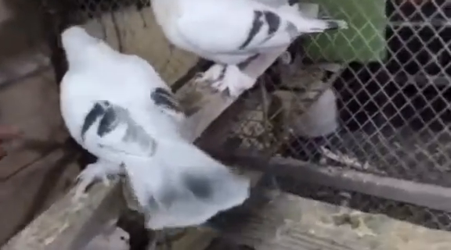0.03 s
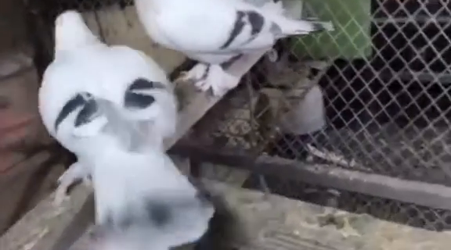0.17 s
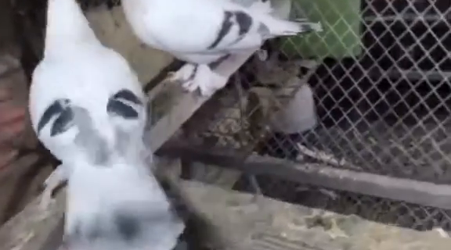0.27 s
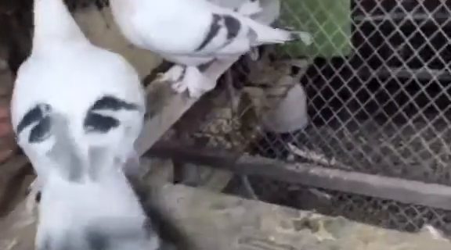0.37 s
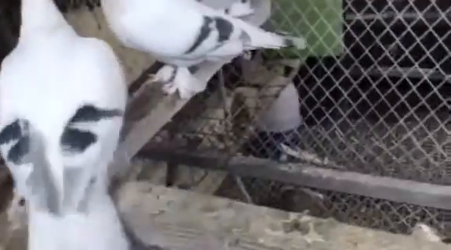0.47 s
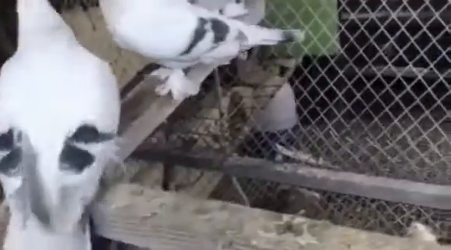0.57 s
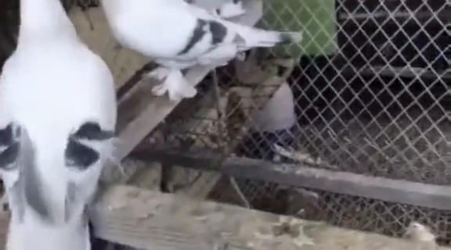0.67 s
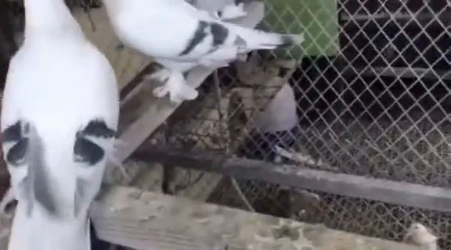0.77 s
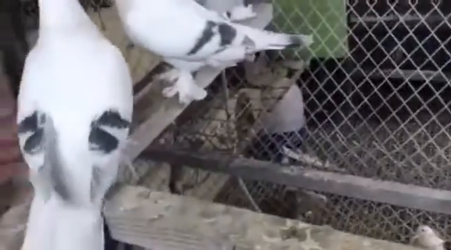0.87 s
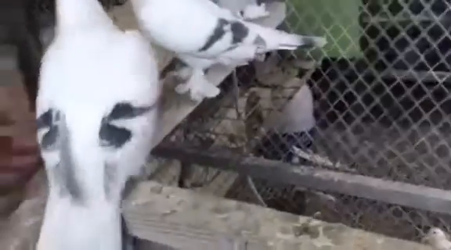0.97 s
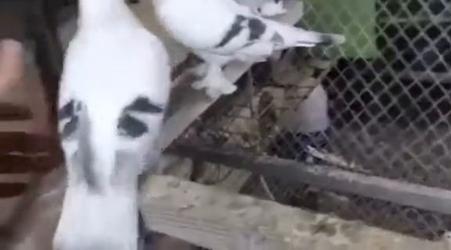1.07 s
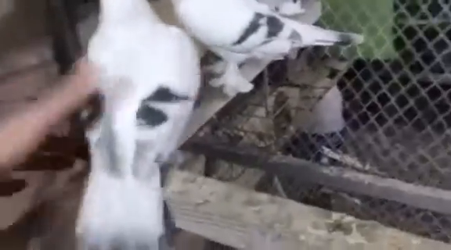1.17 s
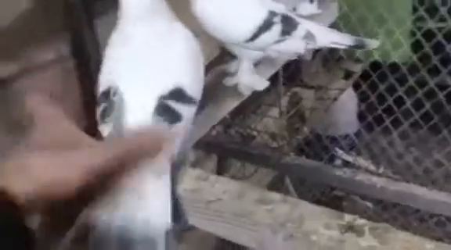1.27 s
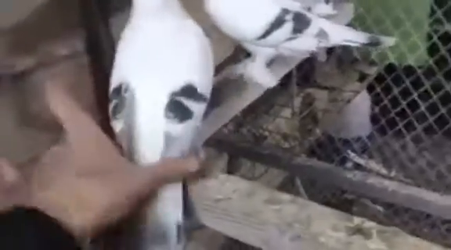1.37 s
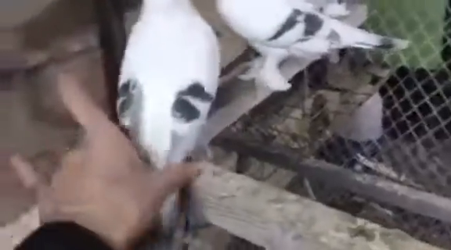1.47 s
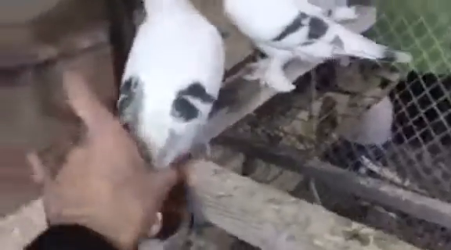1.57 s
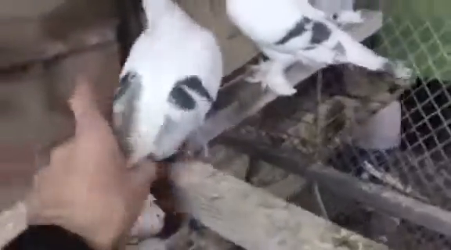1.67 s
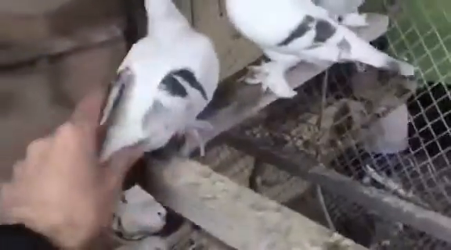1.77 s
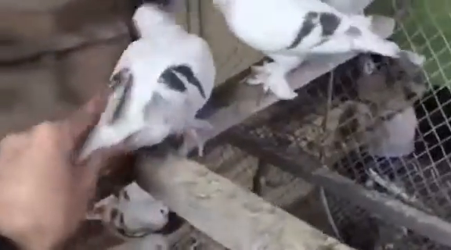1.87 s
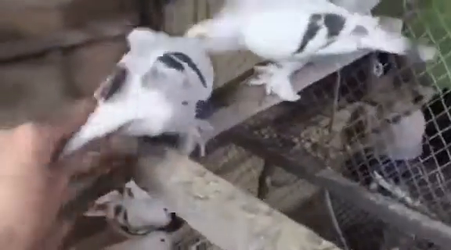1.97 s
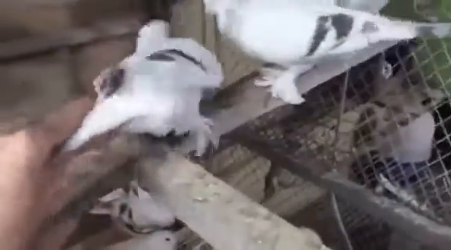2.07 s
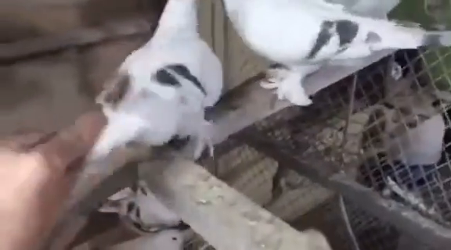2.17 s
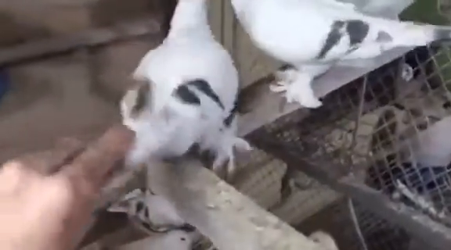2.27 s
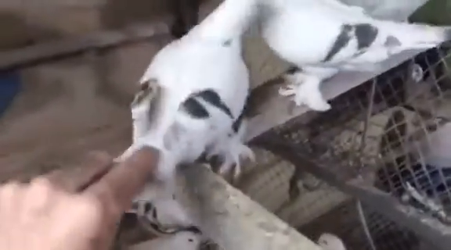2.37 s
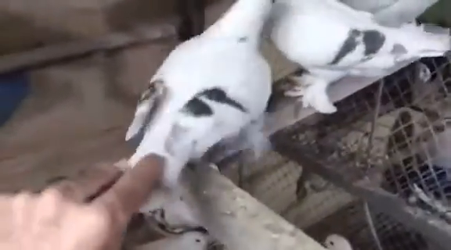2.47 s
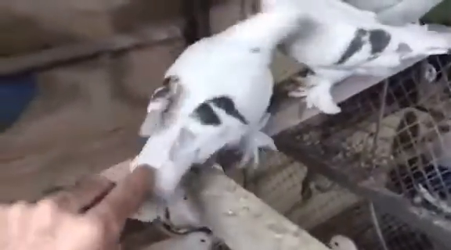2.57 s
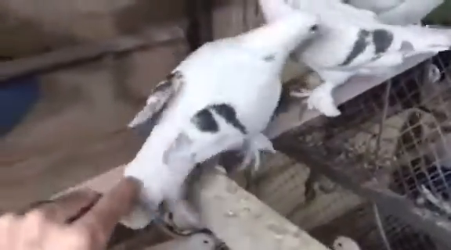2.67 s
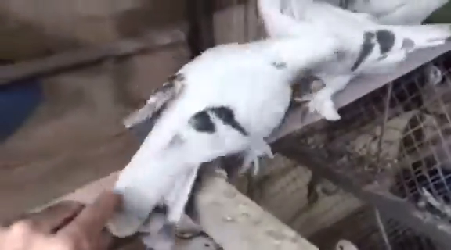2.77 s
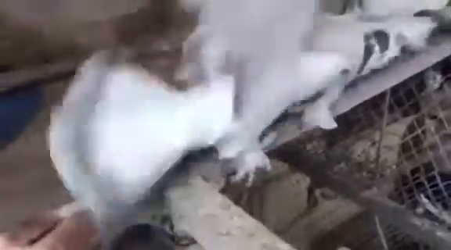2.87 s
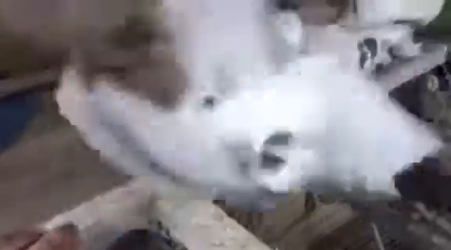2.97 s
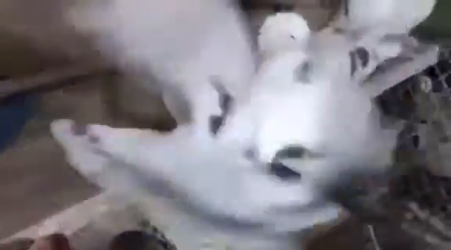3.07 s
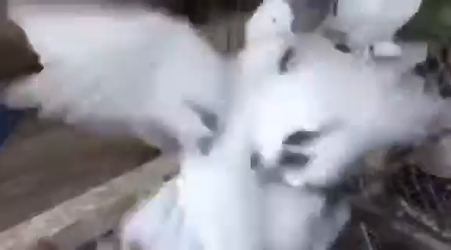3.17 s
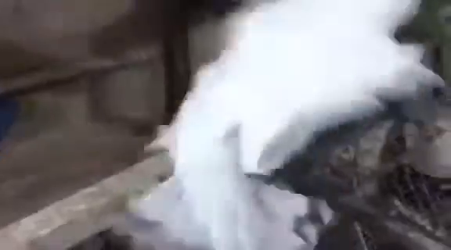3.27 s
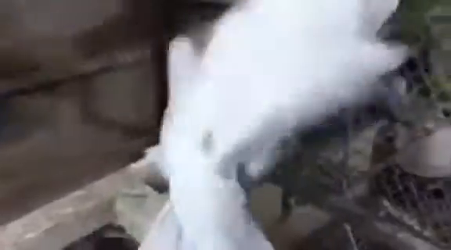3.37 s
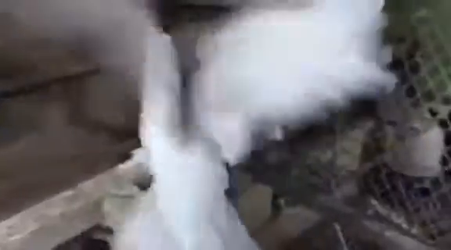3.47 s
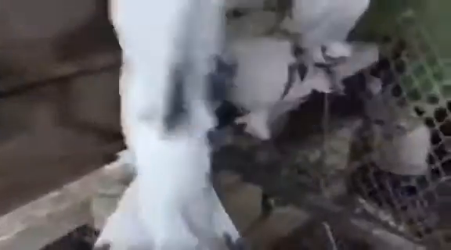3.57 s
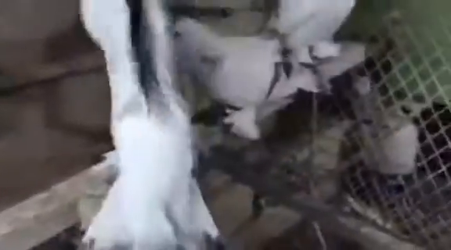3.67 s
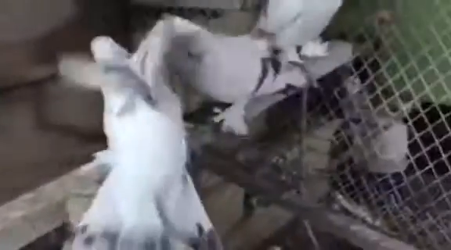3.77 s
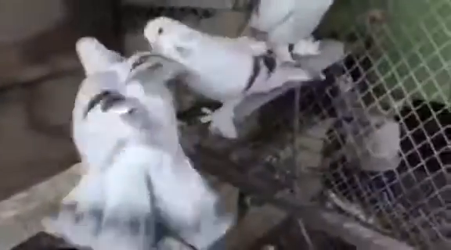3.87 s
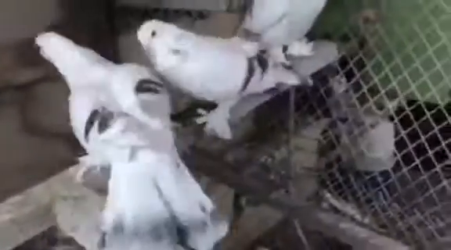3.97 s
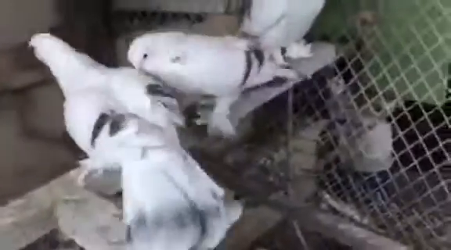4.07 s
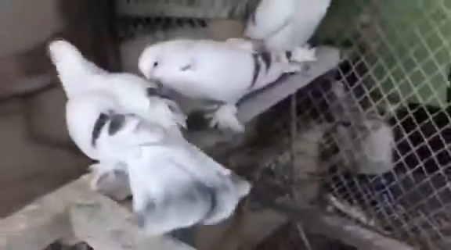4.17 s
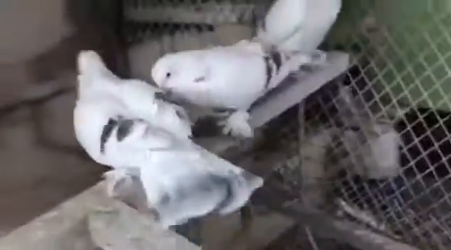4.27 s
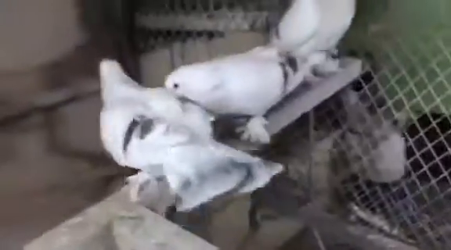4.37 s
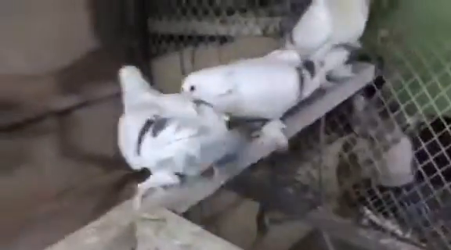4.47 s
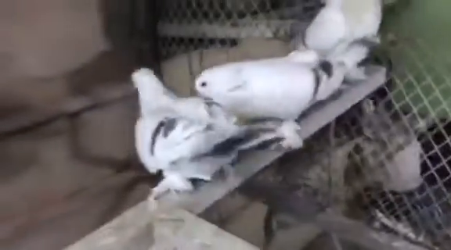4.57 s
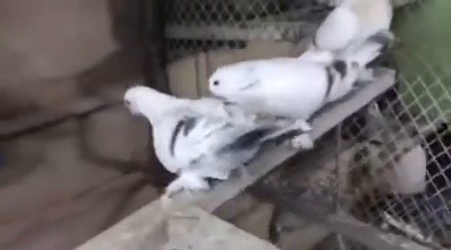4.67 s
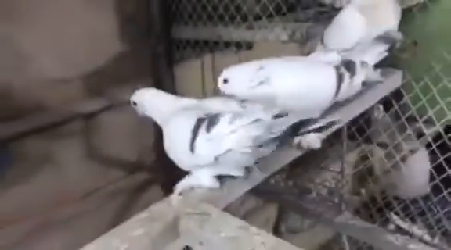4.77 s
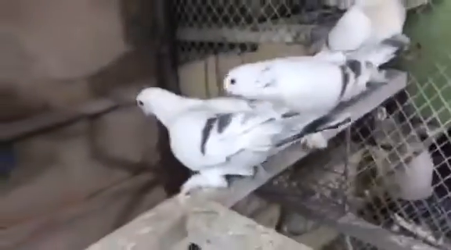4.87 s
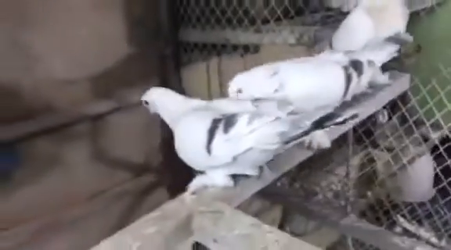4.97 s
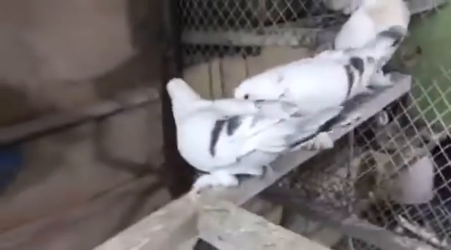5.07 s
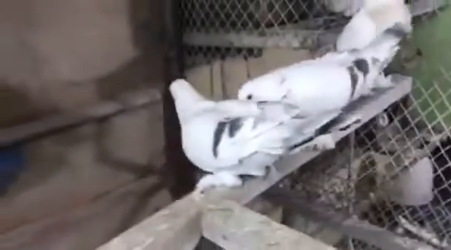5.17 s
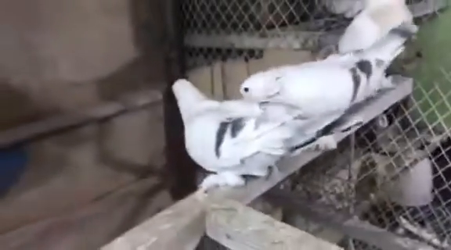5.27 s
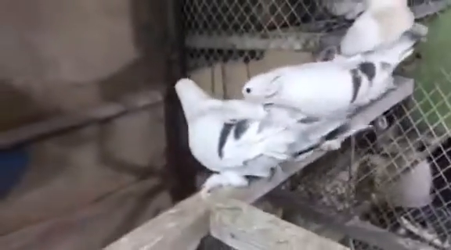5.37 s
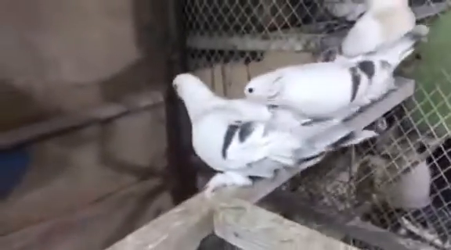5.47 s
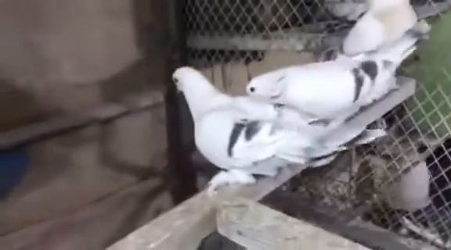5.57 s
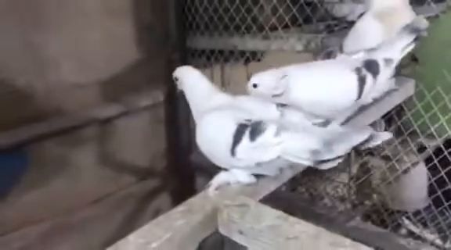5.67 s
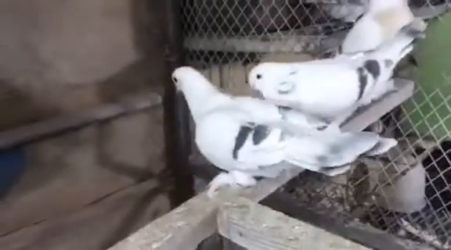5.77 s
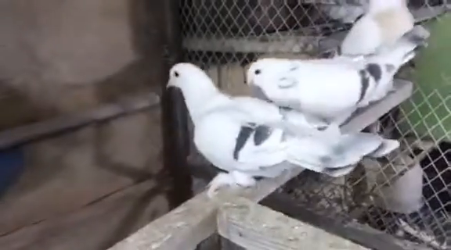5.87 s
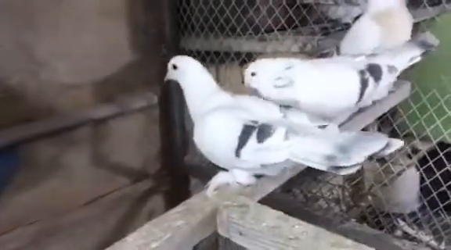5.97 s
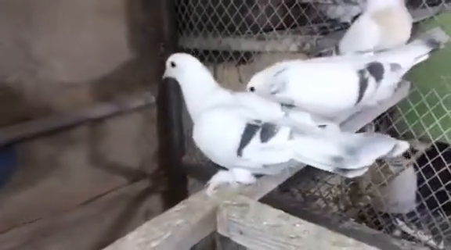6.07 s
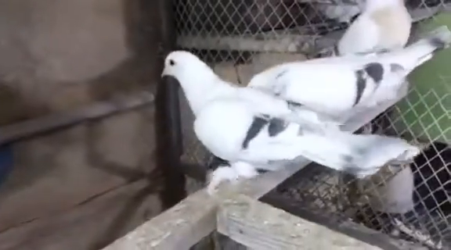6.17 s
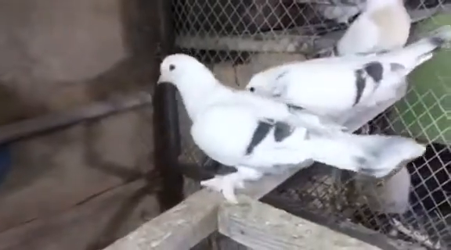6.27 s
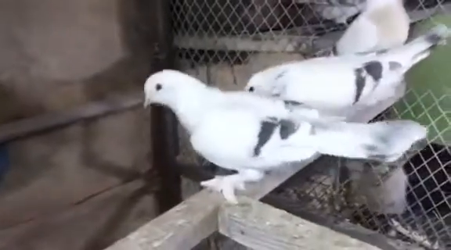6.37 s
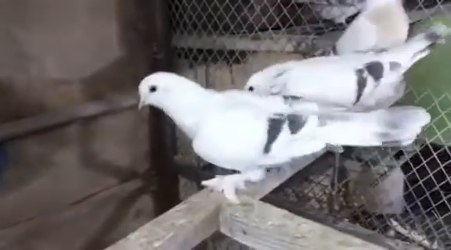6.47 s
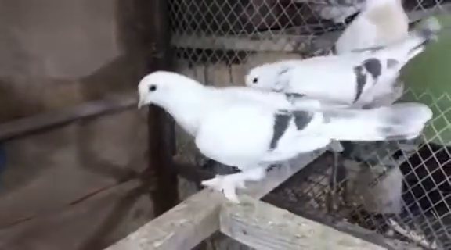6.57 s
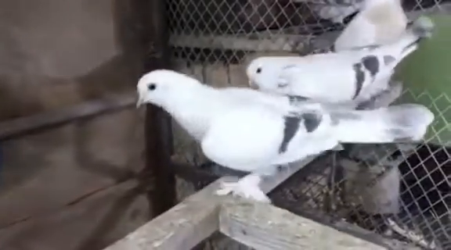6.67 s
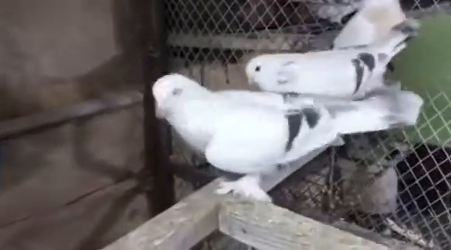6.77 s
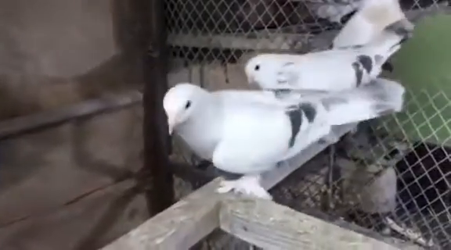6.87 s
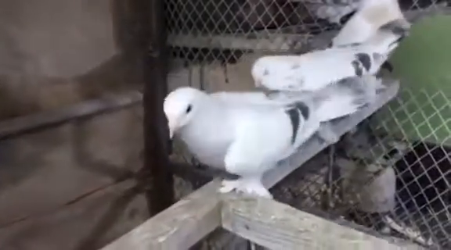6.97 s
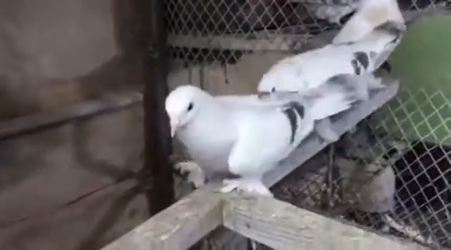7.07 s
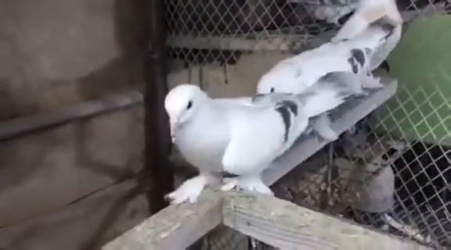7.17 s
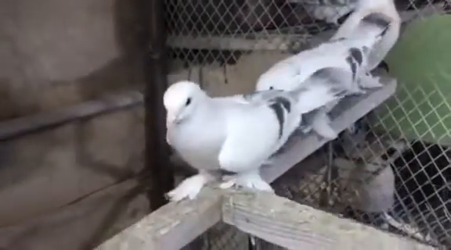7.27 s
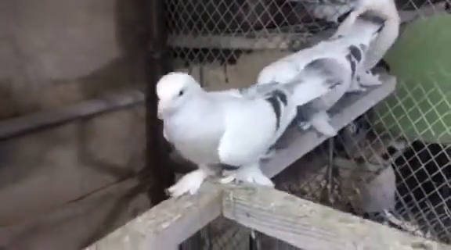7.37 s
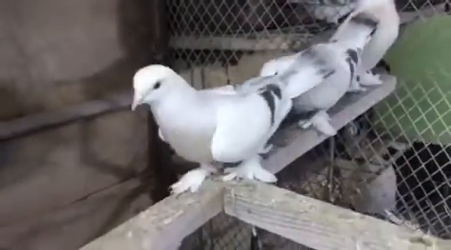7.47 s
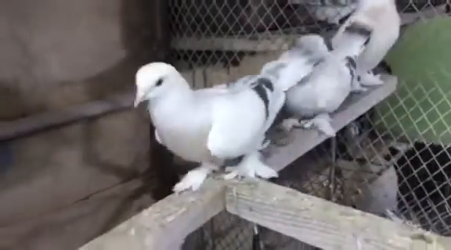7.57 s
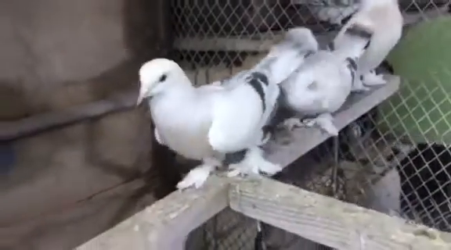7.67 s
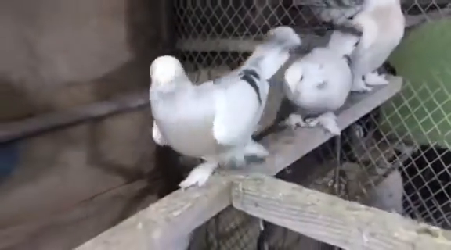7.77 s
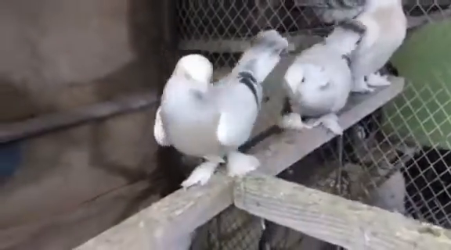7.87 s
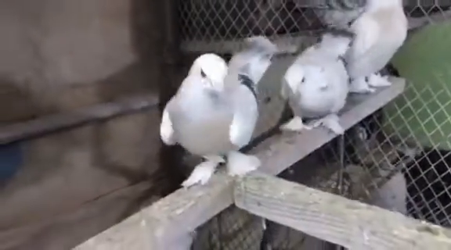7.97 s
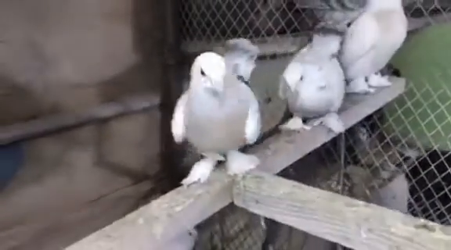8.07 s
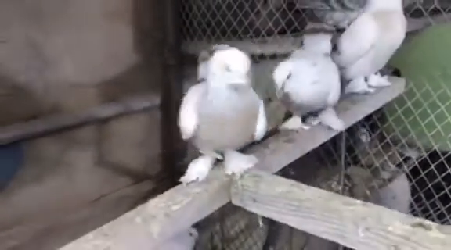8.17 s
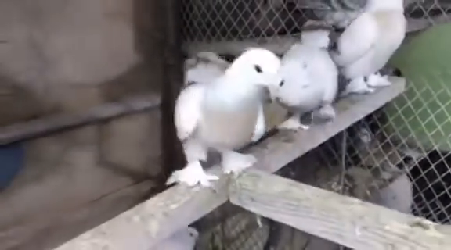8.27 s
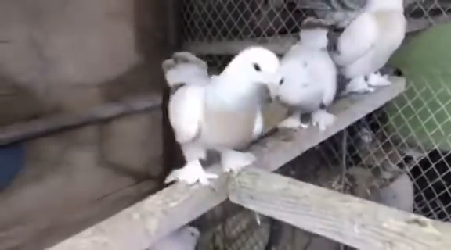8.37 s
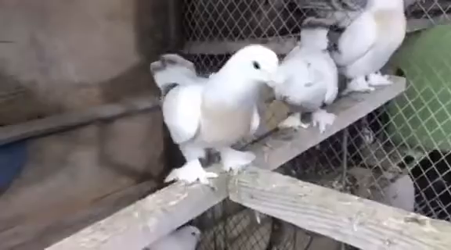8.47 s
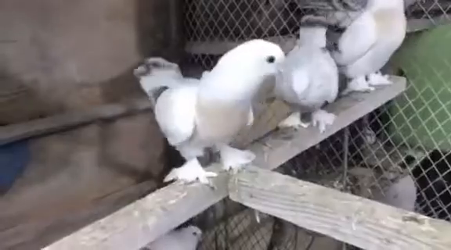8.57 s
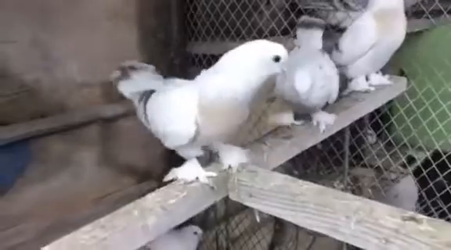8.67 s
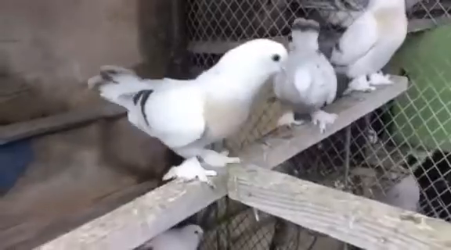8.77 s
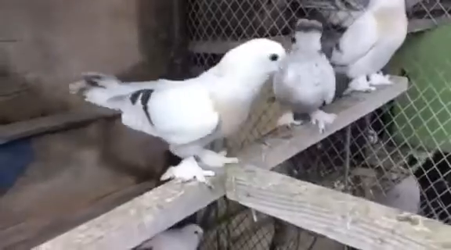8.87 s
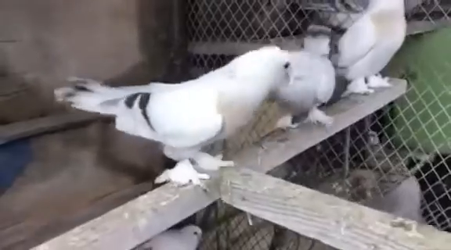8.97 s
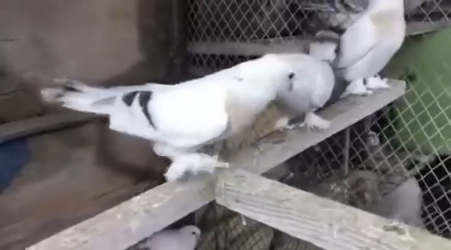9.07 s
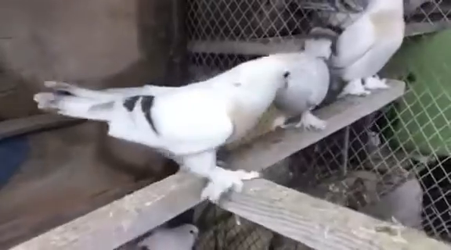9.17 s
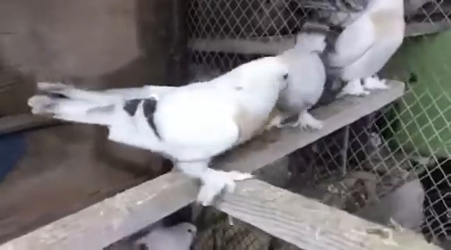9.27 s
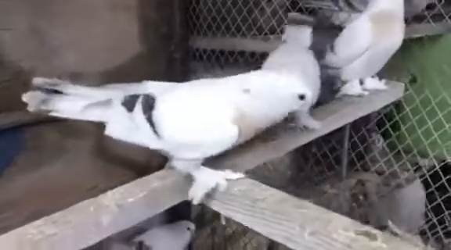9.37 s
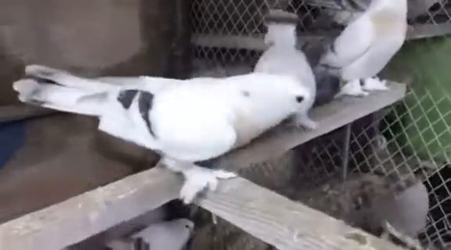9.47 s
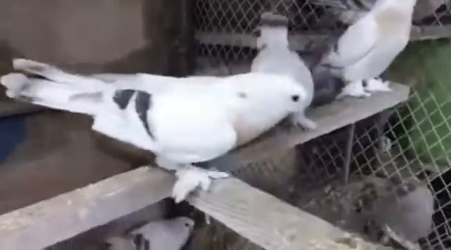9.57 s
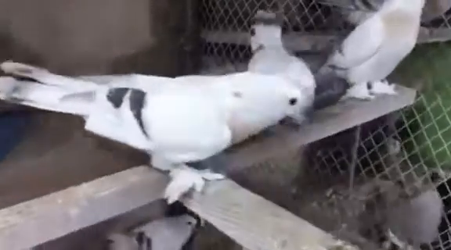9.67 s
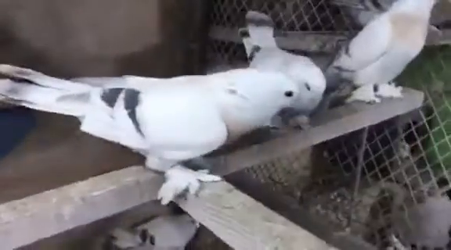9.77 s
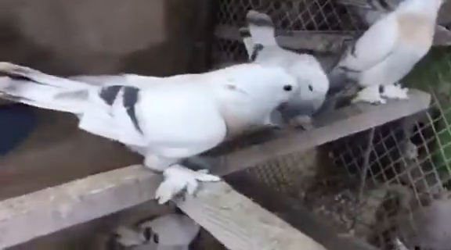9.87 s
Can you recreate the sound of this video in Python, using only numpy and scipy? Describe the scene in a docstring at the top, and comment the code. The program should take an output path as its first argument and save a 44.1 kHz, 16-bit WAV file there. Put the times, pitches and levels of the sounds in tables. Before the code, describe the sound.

Throughout, two low motors hum together, swelling and sinking roughly every 0.7 seconds over a dull outdoor rumble; a thin, faint whine rises around 1-2 seconds, then lingers. Close to a phone in a small wooden loft, a pigeon shifts on its perch: sharp claw ticks and a tiny scrape at 0.4, soft feather rustles and more ticks until a stronger rustle at 2.8. From 2.95 to 3.4 come five quick wing claps, crisp cracks with hollow pops and low air thumps, the last weaker, then feathers settling. Cooing starts softly at 4.3 and returns around 5.2, 6.3, 7.3, 8.5 and 9.4: rolling throaty throbs, muffled gliding moans, and low growls ending the phrases. Short fluttering rasps come around and between phrases. Light claw ticks and faint rustles continue to the end, with short woody reflections.

```python
"""Two motors hum and beat slowly throughout, over a dull outdoor rumble and thin filtered-noise whines.
First a pigeon, nudged along its perch in a small wooden loft, ticks its claws and rustles: bursts of noise.
Around three seconds in come five wing claps: noise cracks through quill resonances, with decaying sine pops and thumps.
Then a cock coos in rolling phrases: throaty throbs, soft gliding moans and growls built from sine partials,
with rasps around them from a fluttering throat resonance, while claws go on ticking on wood close to a phone."""
import sys
import numpy as np
from scipy import signal
from scipy.fft import rfft, irfft
from scipy.io import wavfile
from scipy.ndimage import uniform_filter1d

SR = 44100
rng = np.random.default_rng(int(sys.argv[2]) if len(sys.argv) > 2 else 0)


def dump(signal):
    """Clip the signal to [-1, 1] and save it as 16-bit WAV at the path in sys.argv[1]."""
    limited = np.clip(np.atleast_2d(signal).T, -1, 1)
    pcm = np.round(limited * 32767).astype(np.int16)
    wavfile.write(sys.argv[1], SR, pcm)


N = 437913
T = np.arange(N) / SR

# Spectrum of the outdoor rumble: pitch_hz, relative level_db
RUMBLE_COLOUR = [(20, -32), (35, -3), (50, -3), (70, 2.5), (110, 0), (170, -4), (240, 3.5), (330, 1),
                 (430, -7), (650, -7), (1000, -8), (1400, -15), (2200, -25.5), (3500, -31.5), (6000, -39),
                 (9000, -47.5)]
# Weaker steady lines of the motor hum: pitch_hz, level_db (mean of a slow waver)
HUM_LINES = [(52, -56.5), (158, -57.5), (206, -56), (229, -59.5), (283, -54.5)]
# Spectrum of sliding feathers: pitch_hz, relative level_db
FEATHER_SPECTRUM = [(300, -17.5), (900, -19.5), (1500, -4.5), (2400, -2), (4000, -1.5), (4800, -4),
                    (5600, 3), (7000, -5.5), (9000, -7)]
# A bird shifts and its feathers slide over each other: centre_s, level_db (before flutter), half_length_s
FEATHER_RUSTLES = [(0.48, -60.5, 0.16), (0.865, -63.5, 0.089), (1.22, -59, 0.035), (1.98, -62, 0.11),
                   (2.173, -58.5, 0.057), (2.454, -63, 0.09), (2.787, -49, 0.063), (2.808, -44, 0.013),
                   (2.885, -48.5, 0.059), (3.534, -59, 0.48), (3.785, -49.5, 0.034), (4.04, -62, 0.043),
                   (4.37, -61, 0.12), (6.807, -64, 0.073), (7.054, -59.5, 0.033), (7.546, -61.5, 0.024),
                   (7.76, -64, 0.13), (9.01, -65.5, 0.081), (9.492, -69, 0.19)]
# Clearest ticks of claws on the perch: start_s, relative level_db, centre_hz
CLAW_TICKS = [(0.369, -45.5, 6500), (0.4016, -31.5, 3950), (.418, -47, 2000), (0.88, -35.5, 8000),
              (.883, -42.5, 4100), (1.344, -48.5, 4770), (1.875, -51.5, 6950), (2.1291, -39.5, 6100),
              (2.175, -42.5, 2540), (2.411, -36.5, 4650), (2.475, -45, 3000), (2.5974, -43, 1850),
              (2.801, -36, 6000), (2.813, -30, 5500), (2.818, -36.5, 3800), (2.877, -43, 5000),
              (3.536, -41, 4400), (3.5776, -42.5, 4180), (3.8, -43, 3000), (4.151, -54.5, 7540),
              (4.195, -51, 5500), (4.21, -43, 5030), (4.309, -52, 4000), (4.33, -40, 7500),
              (4.337, -34.5, 8000), (4.418, -46, 5210), (4.488, -53, 5500), (4.9515, -43.5, 4970),
              (5.456, -45.5, 1840), (6.16, -46, 6400), (6.555, -39.5, 5230), (6.748, -44.5, 5970),
              (7.346, -49.5, 6550), (7.792, -48, 7200), (7.8228, -44, 4630), (8.204, -50.5, 5940),
              (8.61, -45.5, 3460), (8.699, -41.5, 4700), (8.93, -43.5, 2580), (9.347, -45, 6450),
              (9.439, -51, 8600), (9.5982, -41.5, 5700)]
# Feet dragging over the perch: start_s, end_s, level_db (before the swell), centre_hz
FOOT_SCRAPES = [(0.404, 0.439, -50, 2270), (0.404, .44, -56.5, 8000), (0.888, .93, -71, 5900),
                (2.128, 2.193, -65, 5530), (4.332, 4.348, -53, 2530), (6.844, 6.871, -54, 3000),
                (9.555, 9.6, -67, 4160)]
# Wing claps: start_s, relative level_db, contact_s, thump_db (low thump of air), pop_db (hollow pop), pop_hz,
# tilt_db_per_octave (treble), lower_quill_hz, upper_quill_hz, tip_lag_s, tip_slap_db (against the first slap)
WING_CLAPS = [(2.945, -20, 0.0014, -30, -16.5, 910, -0.86, 1950, 4630, 0.0065, -15),
              (3.057, -20, 0.002, -26, -18, 970, 0.92, 2450, 5900, 0.0024, 5.5),
              (3.1678, -19, 0.0012, -26, -19, 895, 2, 1600, 3780, .002, -23.5),
              (3.28, -16.5, 0.00092, -21.5, -15, 865, -1.7, 2880, 3850, 0.00306, -8),
              (3.409, -29, 0.0016, -36, -43, 900, 1.6, 4370, 6100, 0.0065, -16)]
# Spectrum of a clap before its tilt: pitch_hz, relative level_db
CLAP_SPECTRUM = [(100, -15), (300, 0), (550, -3.5), (880, -2), (1250, -0.5), (1600, -0.5), (2100, -3),
                 (2700, -2.5), (3700, -1), (4900, -3.5), (6500, -3), (8300, -4.5), (10000, -8)]
# Rasps around the phrases: start_s, length_s, level_db (at the peak, before shimmer),
# first_throat_hz, last_throat_hz (throat resonance), peak_place (0-1)
THROAT_RASPS = [(4.736, 0.14, -50.5, 965, 1070, 0.13), (5.105, 0.055, -43.5, 1020, 1040, 0.24),
                (5.727, 0.18, -41, 960, 1078, 0.15), (6.139, 0.056, -46.5, 960, 1037, 0.45),
                (6.732, 0.11, -41.5, 833, 977, 0.5), (7.186, 0.051, -42, 930, 1017, 0.48),
                (7.755, 0.077, -45, 795, 946, 0.7), (8.073, 0.074, -41, 984, 1182, 0.27),
                (8.381, 0.062, -39, 924, 1023, 0.4), (8.967, 0.16, -48, 867, 985, 0.46)]
# Throbs in rolls of two to four: centre_s, centre pitch_hz (before the arch), relative level_db,
# octave_db (against the fundamental), roughness (0-1)
COO_THROBS = [(4.278, 299.5, -39.5, -4.5, 0.66), (4.356, 294.4, -39, -8, 0.75),
              (4.439, 307.3, -41, -4.5, 0.57), (4.521, 315.6, -43.5, -4.5, 0.54),
              (5.232, 319.4, -42.5, 1, 0.35), (5.343, 319, -39.5, -1, 0.42), (5.459, 330, -41.5, 0.5, 0.37),
              (6.265, 313, -40, -3.5, 0.58), (6.379, 321.4, -35, 1, 0.28), (7.321, 314.5, -41, 2, 0.45),
              (7.433, 319, -32, -1, 0.25), (8.515, 309.4, -36.5, -1, 0.54), (8.619, 316, -35.5, 0.5, 0.3),
              (9.403, 303, -45, 2, 0.51), (9.483, 309.4, -42, -2, .4), (9.556, 291, -37, -2.5, 0.6),
              (9.669, 314.3, -34, -5, 0.54)]
# Moans, each one unbroken glide; rows of: time_s, pitch_hz, level_db, octave_db (against the fundamental)
COO_MOANS = [
    [(4.37, 381, -52, -9), (4.43, 396.4, -48.5, -7), (4.5, 380, -53, -9)],
    [(4.59, 336.6, -48.5, -6), (4.66, 381, -48.5, -13), (4.69, 325, -41, -7), (4.715, 300, -54, -8)],
    [(5.37, 390, -47, -9), (5.41, 427, -45, -12), (5.45, 400, -50, -12)],
    [(5.485, 293, -45, 1), (5.52, 368.5, -44, -15), (5.55, 378, -42, -18), (5.575, 333, -44.5, -2),
     (5.6, 318, -52, 8), (5.62, 300, -52, 9)],
    [(5.575, 429, -47, -14), (5.62, 390, -47, -9), (5.65, 374, -37.5, -11), (5.68, 395, -50, -14)],
    [(6.305, 312, -52, 5), (6.33, 303, -49, 7), (6.36, 285, -52, 1.5)],
    [(6.405, 385, -47.5, -12), (6.44, 411, -43.5, -15), (6.47, 393, -48, -19), (6.52, 432, -46, -22),
     (6.555, 408, -42, -12), (6.577, 326, -34, -4), (6.6, 296, -46, 4)],
    [(6.935, 360, -49, -12), (6.965, 331, -40, -14), (7.0, 279, -44, -13)],
    [(7.325, 318, -48, -4), (7.36, 360, -45, -14), (7.38, 395, -50, -14)],
    [(7.355, 312, -57, 10), (7.382, 311, -53, 10), (7.415, 305, -55, 10)],
    [(7.46, 429.4, -49, -14), (7.52, 397, -47.5, -18), (7.56, 409, -53.5, -14), (7.59, 418, -45, -15),
     (7.608, 340, -37.5, -11), (7.625, 300, -48, 0)],
    [(8.455, 340, -43, -12), (8.48, 376, -41.5, -15), (8.505, 385, -48, -9)],
    [(8.525, 302, -53, 8), (8.56, 295, -54, 9), (8.595, 322, -56, 8)],
    [(8.645, 448, -50, -14), (8.72, 461, -58, -10), (8.785, 469, -55, -14), (8.803, 361, -47, -10),
     (8.82, 313, -33, -5.5), (8.845, 235, -48, -13)],
    [(9.34, 243, -42, -16), (9.365, 261.3, -40, -17), (9.4, 302, -41, -10), (9.445, 340, -41, -18),
     (9.468, 344, -43, -14), (9.484, 306, -36, -8), (9.505, 265, -47, -5)],
    [(9.47, 376, -48, -16), (9.51, 350, -42.5, -12), (9.55, 315, -44, -10)],
    [(9.5, 255, -55, 5), (9.53, 274.4, -54, 10), (9.6, 284, -58, 8.5), (9.65, 285.4, -52, 10),
     (9.7, 290, -54, 7), (9.75, 249.4, -56.5, 10), (9.8, 256, -56, 12), (9.83, 238, -56, 10)],
    [(9.575, 328, -46, -6), (9.605, 307, -43.5, -2), (9.625, 314, -53, 8), (9.65, 318, -56, 5)],
    [(9.818, 350, -49, -3), (9.842, 336, -32, -8), (9.868, 313, -49, -12)],
]
# Growls that end the phrases, their third partial near the throat resonance;
# rows of: time_s, pitch_hz, level_db, octave_db, third_partial_db (both against the fundamental)
COO_GROWLS = [
    [(4.7, 221.6, -59, -5, 0), (4.83, 228, -57, -6, 0)],
    [(5.655, 231, -49, -6, 2), (5.68, 223, -44.5, -10, 0), (5.72, 207, -52, -8, -4)],
    [(6.595, 217, -50, 6, 9), (6.62, 221.4, -52, 6, 15), (6.655, 232.4, -52, 2, -3),
     (6.69, 244, -51.5, 1, -7), (6.72, 238, -57, -1, -6)],
    [(7.615, 218, -49, 1, 5), (7.65, 226.7, -48, -6, 3), (7.675, 244, -46, -5, 1),
     (7.705, 261, -46.5, 2, -4), (7.745, 255, -54, -2, -7)],
    [(8.82, 207, -48, -6, 3), (8.87, 213.6, -55, -9, 7.5), (8.9, 218.3, -43.5, -13, -6),
     (8.94, 202, -46.5, -3, 0)],
    [(9.85, 225, -51, 3, -2), (9.88, 226, -44.5, -1, -4), (9.94, 210, -51, -2, 0)],
]


def undb(db):
    """Decibels to gain."""
    return 10 ** (np.asarray(db) / 20)


def unit(x):
    """Scale to rms 1."""
    return x / np.sqrt(np.mean(x ** 2) + 1e-20)


def add(out, s, x):
    """Mix a sound in at a time in seconds."""
    i = int(s * SR)
    out[i:i + len(x)] += x[:max(N - i, 0)]


def noise(size=N):
    """White noise, rms near 1."""
    return rng.standard_normal(size)


def walk(rate_hz, size=N):
    """Smooth random wandering, spread near 1."""
    k = max(int(SR / rate_hz), 1)
    steps = np.repeat(noise(size // k + 1), k)
    return 1.3 * uniform_filter1d(uniform_filter1d(steps, k), k)[:size]


def colour(x, points):
    """Causal filter through (Hz, dB) points, with unit power gain."""
    hz, db = np.transpose(points)
    size = 8192
    f = np.maximum(np.fft.rfftfreq(size, 1 / SR), 1)
    log_gain = np.log(undb(np.interp(np.log(f), np.log(hz), db)))
    # folding the cepstrum gives minimum phase, so nothing sounds early
    cepstrum = irfft(log_gain)
    cepstrum[1:size // 2] *= 2
    cepstrum[size // 2 + 1:] = 0
    response = irfft(np.exp(rfft(cepstrum)))
    return signal.fftconvolve(x, response / np.linalg.norm(response))[:len(x)]


def even(x, span_hz=700):
    """Level out the broad chance humps in the spectrum of a short burst."""
    power = uniform_filter1d(np.abs(rfft(x)) ** 2, max(int(span_hz * len(x) / SR), 1))
    hz = np.fft.rfftfreq(len(x), 1 / SR) + 1
    return colour(x, np.column_stack([hz, -10 * np.log10(power + 1e-12)]))


def resonate(x, hz, width_hz):
    """One resonance, gain 1 at its centre."""
    return signal.lfilter(*signal.iirpeak(min(hz, SR / 3), hz / width_hz, fs=SR), x)


def resonate_twice(x, hz, width_hz):
    """Two equal resonances in a row, for steeper sides."""
    return resonate(resonate(x, hz, width_hz), hz, width_hz)


def background(rumble_db=-47.5, high_whine_hz=6600, high_whine_db=-81):
    """A dull outdoor rumble; a thin whine swells for a second and lingers faintly beside a higher one."""
    rumble = unit(colour(noise(), RUMBLE_COLOUR)) * undb(rumble_db + .5 * walk(1.0) + 0.75 * walk(14))
    swell_db = np.interp(T, [.75, .95, 1.3, 1.9, 2.1, 4.5], [-76, -69.0, -66, -68.5, -72.5, -78])
    whine = unit(resonate_twice(noise(), 4750, 230))
    whine += undb(-4) * unit(resonate(noise(), 3190, 440))
    high_whine = unit(resonate_twice(noise(), high_whine_hz, 140))
    return rumble + whine * undb(swell_db + 1.3 * walk(8.3)) + high_whine * undb(high_whine_db)


def motors(hz=78.3, db=-45, second_db=-3.5, beat_hz=1.422, dip_s=.365):
    """Two motors run at nearly the same speed, so their hum swells and sinks; weaker lines waver above and below."""
    phase = 2 * np.pi * (hz * T + .04 * walk(2.5))
    # the second motor opposes the first at dip_s and once per beat after it
    beat = 2 * np.pi * beat_hz * (T - dip_s)
    drone = undb(db + 1.3 * walk(11)) * (np.sin(phase) - undb(second_db) * np.sin(phase + beat))
    lines = np.zeros(N)
    for line_hz, line_db in HUM_LINES:
        line_phase = 2 * np.pi * (line_hz * T + 0.21 * walk(7))
        lines += undb(line_db + 2.0 * walk(4)) * np.sin(line_phase)
    return drone + lines


def loft(x, early_db=-6, early_s=0.018, late_db=-14, t60_s=0.3):
    """Near boards scatter the sound at once; a short tail follows."""
    t = T[:SR // 2]
    early, late = rng.standard_normal((2, len(t))) * (t > .002)
    early = early * np.exp(-t / early_s)
    late = late * undb(-60 * t / t60_s)
    response = undb(early_db) * early / np.linalg.norm(early) + undb(late_db) * late / np.linalg.norm(late)
    return x + signal.fftconvolve(x, response)[:N]


def feathers(grain_db=3, grains_per_s=5000, draught_db=-8, draught_hz=80,
             flicks_per_s=30, flick_db=-1, flick_s=0.0053, preening_db=-73):
    """Barbs catch and slip in dense tiny grains, now and then a quill flicks free; movement stirs a low draught."""
    grains = (rng.random(N) < grains_per_s / SR) * noise()
    grains *= undb(grain_db * np.minimum(rng.exponential(size=N), 4))
    flicks = signal.fftconvolve(rng.random(N) < flicks_per_s / SR, np.exp(-T[:SR // 20] / flick_s))[:N]
    grains = grains * (1 + undb(flick_db) * flicks)
    draught = undb(draught_db) * unit(resonate(noise(), draught_hz, 100))
    # each wing stroke swishes 0.05 s ahead of its clap, at a level relative to the clap
    swishes = [(s - .05, db - 31.5, .04) for s, db, *_ in WING_CLAPS]
    # a faint stir of feathers runs throughout
    power = undb(preening_db) ** 2
    for s, db, half_s in FEATHER_RUSTLES + swishes:
        swell = np.exp(-np.minimum(((T - s) / half_s) ** 2, 20))
        power = power + (undb(db) * swell) ** 2
    catching_db = 1.0 * walk(45) + 1.2 * walk(220)
    return (unit(colour(grains, FEATHER_SPECTRUM)) + draught) * np.sqrt(power) * undb(catching_db)


def claws(decay_s=0.0047, scrape_s=0.01, scrape_db=-16, width_hz=4500, gain_db=-21, grit_db=3,
          ring_width_hz=500, ring_db=-3, steps_per_s=0.92, step_db=-51.5, step_spread_db=5.5, step_hz=5000):
    """A sharp tick with a short ragged scrape behind it and a brief ring; fainter steps fall at random."""
    out, t = np.zeros(N), T[:SR // 10]
    steps = []
    for when, force, tone in rng.random((round(steps_per_s * N / SR), 3)):
        steps.append((when * N / SR, step_db + step_spread_db * (2 * force - 1), step_hz * (.5 + tone)))
    for s, db, hz in CLAW_TICKS + steps:
        scrape = undb(scrape_db + grit_db * walk(420, size=len(t))) * np.exp(-t / scrape_s)
        grit = noise(len(t)) * (np.exp(-t / decay_s) + scrape)
        ring = unit(resonate(grit, hz, ring_width_hz))
        tick = unit(resonate(grit, hz, width_hz)) + undb(ring_db) * ring
        add(out, s, undb(db + gain_db) * unit(tick))
    return out


def scrapes(width_hz=2300, grit_db=3):
    """Toes catch and slip on rough wood: ragged noise that swells and fades through a resonance."""
    out = np.zeros(N)
    for start, end, db, hz in FOOT_SCRAPES:
        u = np.linspace(0, 1, int(max(end - start, .02) * SR))
        swell = np.sqrt(np.maximum(np.sin(np.pi * u), 0))
        grit = noise(len(u)) * undb(grit_db * walk(600, size=len(u)))
        add(out, start, undb(db) * swell * unit(resonate_twice(grit, hz, width_hz)))
    return out


def wing_claps(pop_s=0.0035, thump_hz=195, thump_s=0.0043, waft_hz=62, waft_db=-7,
               brush_db=-25, brush_s=0.011, quill_db=1, quill_q=10):
    """Quills crack together, wing tips meet after and brush apart; trapped air pops, the downstroke thumps."""
    cracks, air = np.zeros(N), np.zeros(N)
    t = T[:SR // 10]

    def slap(age, contact_s):
        """Contact builds fast and dies away."""
        return (1 - np.exp(-4 * age / contact_s)) * np.exp(-age / contact_s)

    for s, db, contact_s, thump_db, pop_db, pop_hz, tilt_db, lower_hz, upper_hz, lag_s, tips_db in WING_CLAPS:
        tips = undb(tips_db) * slap(np.maximum(t - lag_s, 0), contact_s)
        brush = undb(brush_db) * np.exp(-t / brush_s)
        quills = noise(len(t)) * (slap(t, contact_s) + tips + brush)
        # the tilt pivots at 2500 Hz and goes no further than an octave below it
        tilted = [(hz, d + tilt_db * np.log2(max(hz / 2500, .5))) for hz, d in CLAP_SPECTRUM]
        crack = colour(even(quills), tilted)
        ring = sum(resonate(crack, hz, hz / quill_q) for hz in (lower_hz, upper_hz))
        add(cracks, s, undb(db) * 0.22 * unit(crack + undb(quill_db) * ring))
        pop = np.sin(2 * np.pi * pop_hz * t) * np.exp(-t / pop_s)
        thump = np.sin(2 * np.pi * thump_hz * t) * np.exp(-t / thump_s)
        waft = np.sin(2 * np.pi * waft_hz * t) * np.exp(-t / 0.017) * (1 - np.exp(-t / 0.0042))
        puff = undb(pop_db) * pop + undb(thump_db) * (thump + undb(waft_db) * waft)
        # the air escapes once the wings have closed
        add(air, s + contact_s / 2, puff)
    return cracks, air


def rasps(flutter_share=.12, width_hz=104, shimmer=.22, jitter=0.028, chest_db=-13):
    """A low uneven flutter in the throat rings a resonance near 1 kHz; both rise as the throat tightens."""
    out = np.zeros(N)
    orders = np.arange(3, 12)[:, None]  # harmonics of the flutter
    for start, length_s, db, first_hz, last_hz, peak in THROAT_RASPS:
        u = np.linspace(0, 1, int(max(length_s, .02) * SR))
        centre = first_hz + (last_hz - first_hz) * u
        pitch = flutter_share * centre
        phase = 2 * np.pi * np.cumsum(pitch * (1 + jitter * walk(202, size=len(u)))) / SR
        throat = 1 / np.sqrt(1 + ((orders * pitch - centre) / width_hz) ** 6)
        chest = undb(chest_db) / (1 + ((orders * pitch - 700) / 180) ** 2)
        voice = unit(np.sum((throat + chest) * np.cos(orders * phase), axis=0))
        push = np.interp(u, [0, np.clip(peak, .05, .95), 1], [0, 1, 0]) ** .8
        add(out, start, undb(db) * push * voice * (1 + shimmer * walk(199, size=len(u))))
    return out


def throb(hz, db, octave_db, rough, third_db=-19, fourth_db=-32, droop=0.1046, rough_db=18):
    """A few cycles from the syrinx, centred in 1/8 s; pitch arches with the push of air, rough ones are brighter."""
    t = T[:SR // 8] - 1 / 16
    # a harder throb is shorter: level in dB against half length in s
    half_s = np.interp(db, [-42, -34], [0.015, 0.0063])
    push = np.exp(-(t / half_s) ** 2)
    jitter = .18 * rough * walk(400, size=len(t))
    shimmer = .6 * rough * walk(500, size=len(t))
    phase = 2 * np.pi * np.cumsum(hz * (1 + droop * (push - .8) + jitter)) / SR
    partials_db = [0, octave_db, third_db + rough_db * rough, fourth_db]
    voice = sum(undb(d) * np.cos((k + 1) * phase) for k, d in enumerate(partials_db))
    return undb(db) * push * voice * (1 + shimmer)


def moan(curve, upper_db, waver=.017, flutter_db=2.5, husk=0.28, edge_s=0.0078):
    """A soft gliding note that trembles huskily; partials above those in the curve keep a fixed relative level."""
    times, *columns = np.transpose(curve)
    t = np.arange(times[0], max(times[-1], times[0] + .02), 1 / SR)
    # edge_s rounds the turns of the glide and sets onset and release
    rounding = max(int(edge_s * SR), 1)
    pitch, db, *partials_db = (uniform_filter1d(np.interp(t, times, c), rounding) for c in columns)
    phase = 2 * np.pi * np.cumsum(pitch * (1 + waver * walk(130, size=len(t)))) / SR
    levels_db = [0, *partials_db, *upper_db]
    voice = sum(undb(d) * np.sin((k + 1) * phase) for k, d in enumerate(levels_db))
    edges = np.clip(np.minimum(t - t[0], t[-1] - t) / edge_s, 0, 1)
    trembling = undb(db + flutter_db * walk(85, size=len(t)))
    return trembling * edges * voice * (1 + husk * walk(400, size=len(t)))


def phrases(throb_db=3, moan_third_db=-23, growl_fourth_db=-10):
    """Throbs roll through gliding moans, and phrases drop into a lower growl at the end."""
    out = np.zeros(N)
    for s, hz, db, octave_db, rough in COO_THROBS:
        # start early so that the burst peaks at its listed time
        add(out, s - 1 / 16, undb(throb_db) * throb(hz, db, octave_db, rough))
    for curve in COO_MOANS:
        add(out, curve[0][0], moan(curve, [moan_third_db]))
    for curve in COO_GROWLS:
        add(out, curve[0][0], moan(curve, [growl_fourth_db]))
    return out


def scene():
    """Wings, feet and coos in the loft, over the hum; puffs of air from the wings reach the phone directly."""
    cracks, air = wing_claps()
    movement = loft(cracks + claws() + scrapes() + feathers(), early_db=-9, late_db=-17)
    # the closed beak and the crop muffle the coo above 1180 Hz
    coo = signal.sosfilt(signal.butter(6, 1180, fs=SR, output="sos"), phrases())
    cooing = loft(coo + rasps(), early_db=-17, early_s=.014, late_db=-14)
    return (background() + motors() + movement + air + cooing)[None]


def record(dry):
    """The phone thins the deepest bass, rounds the loudest peaks and cuts steeply above 9100 Hz."""
    thinned = signal.sosfilt(signal.butter(2, 28, "high", fs=SR, output="sos"), dry)
    rounded = .8 * np.tanh(thinned / .8)
    return signal.sosfilt(signal.ellip(8, .3, 60, 9100, fs=SR, output="sos"), rounded)


dry = scene()
out = record(dry)
dump(out)
```